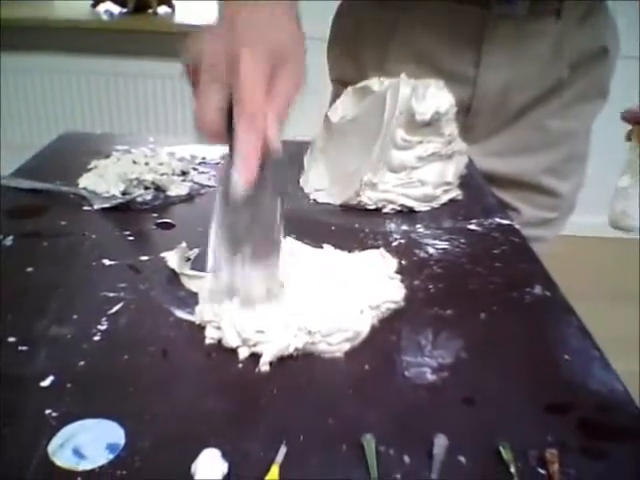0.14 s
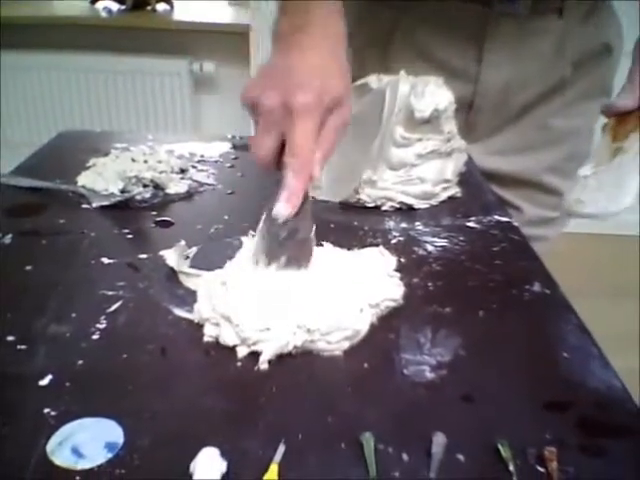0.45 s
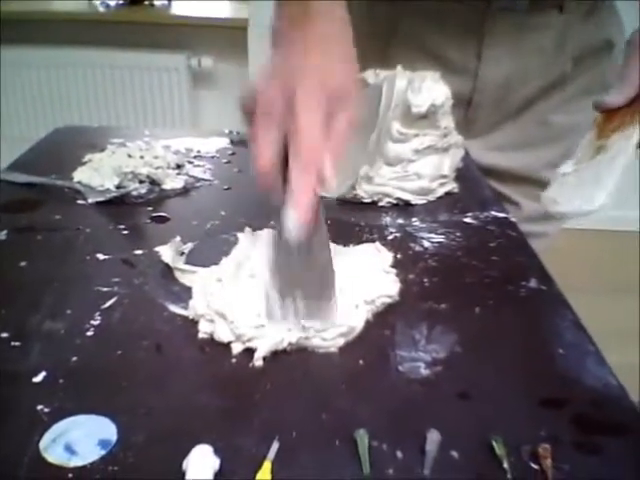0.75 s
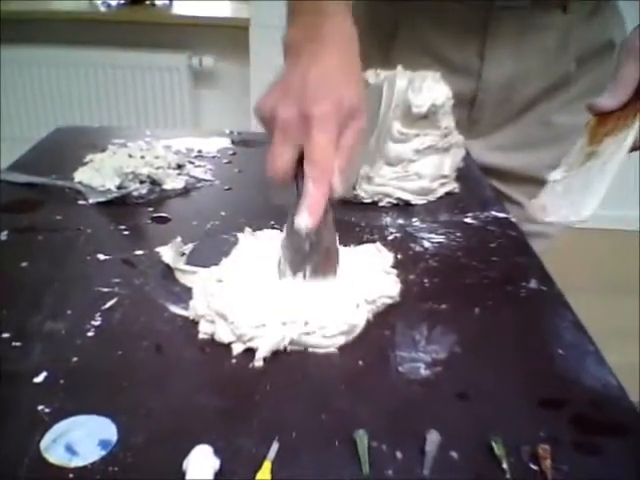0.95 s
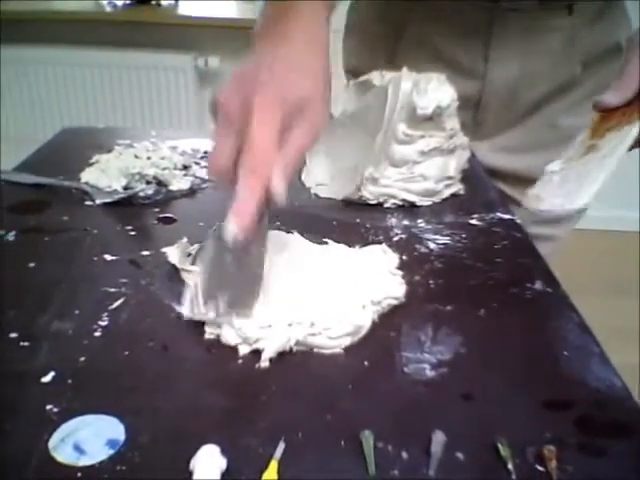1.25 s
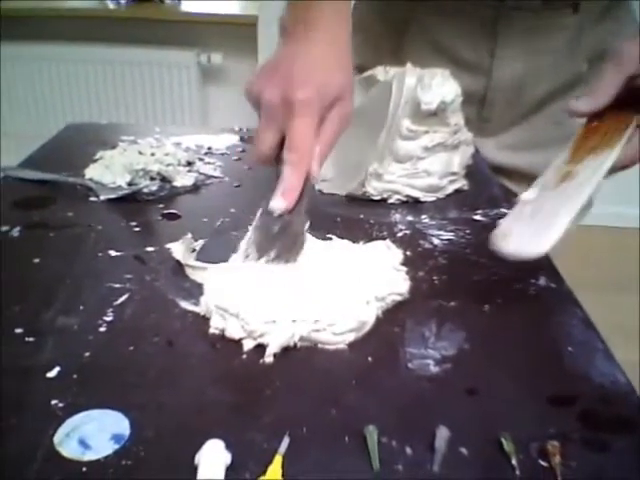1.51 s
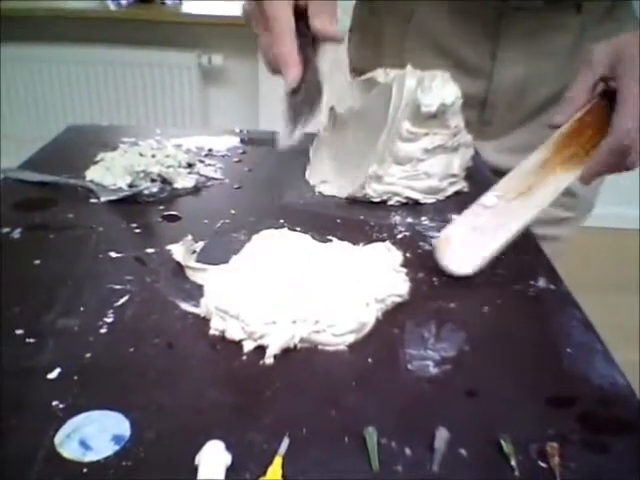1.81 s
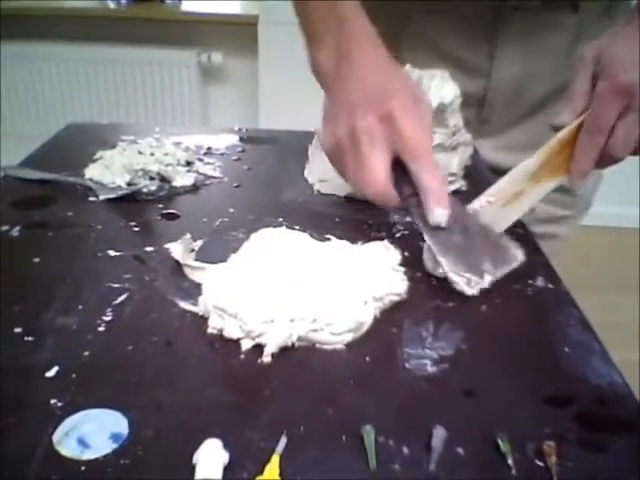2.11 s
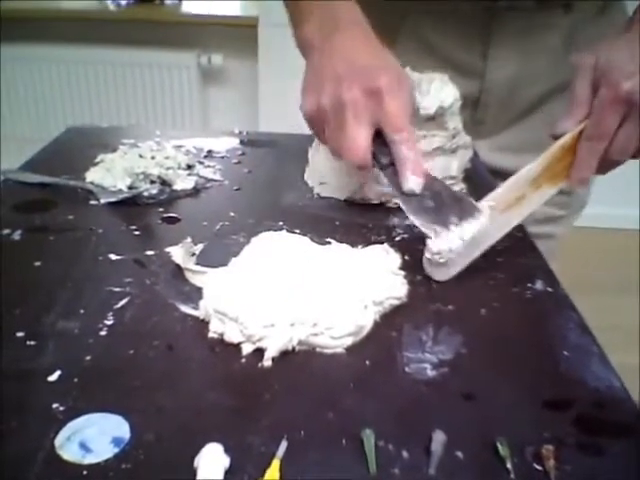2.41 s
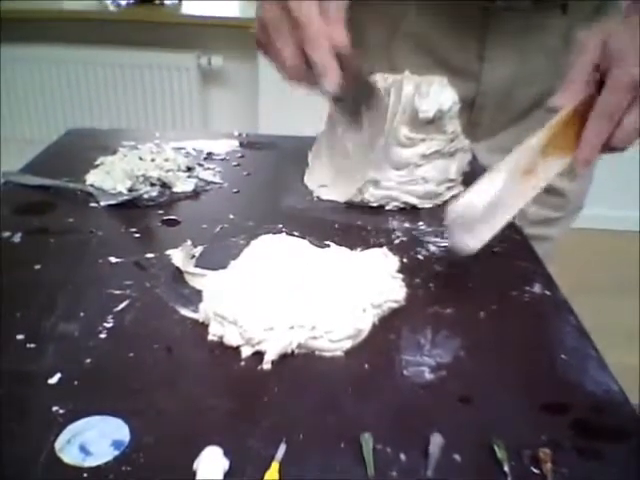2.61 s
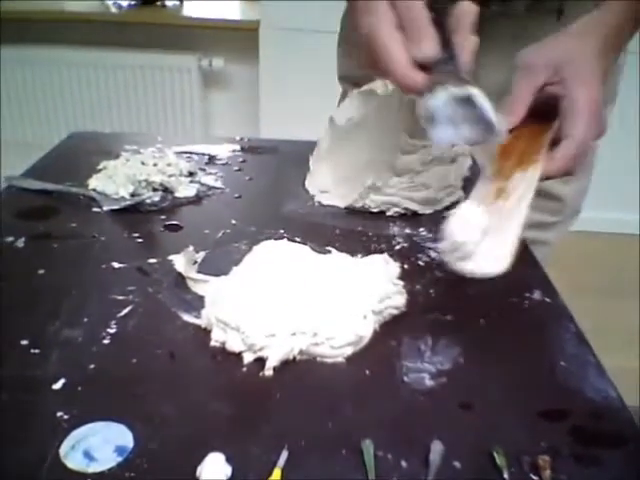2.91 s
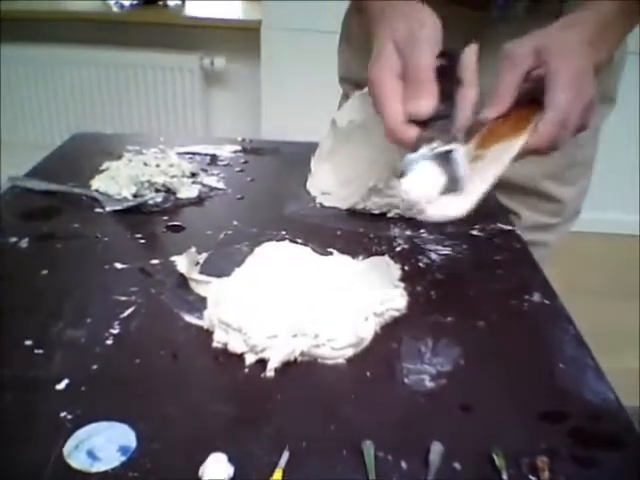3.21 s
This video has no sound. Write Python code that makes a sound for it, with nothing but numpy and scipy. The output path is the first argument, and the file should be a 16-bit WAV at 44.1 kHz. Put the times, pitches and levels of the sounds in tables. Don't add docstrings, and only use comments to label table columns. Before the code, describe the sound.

A steel knife taps and smears wet clay on a tabletop with soft hisses and sticky snaps, then knocks dully on a wooden bat and chatters off it loudly; close recorder, quiet hard room, low hum.

```python
import sys
import numpy as np
from scipy import signal
from scipy.fft import rfft, irfft
from scipy.io import wavfile
from scipy.ndimage import uniform_filter1d

SR = 44100
rng = np.random.default_rng(int(sys.argv[2]) if len(sys.argv) > 2 else 0)


def transcribe(u):
    v = np.clip(np.atleast_2d(u).T, -1, 1)
    q = np.round(v * 32767).astype(np.int16)
    wavfile.write(sys.argv[1], SR, q)


def decibels_to_gain(level_db):
    exponent = np.asarray(level_db, float) / 20
    return 10 ** exponent


N = 147735


def walk(rate_hz):
    k = int(SR / rate_hz)
    held = np.repeat(rng.standard_normal(N // k + 1), k)
    return 1.48 * uniform_filter1d(uniform_filter1d(held, k), k)[:N]


def unit(x):
    return x / np.sqrt(np.mean(x ** 2))


def peak(x):
    return x / np.abs(x).max()


def decay(t_s, t60_s):
    return np.exp(-np.log(1000) * t_s / t60_s)


def tint(x, table, lo_hz=0., hi_hz=31200.0):
    f = np.fft.rfftfreq(len(x), 1 / SR) + 1e-3
    hz, db = np.array(table).T
    edge = 1 / np.sqrt((1 + (lo_hz / f) ** 8) * (1 + (f / hi_hz) ** 8))
    gain = decibels_to_gain(np.interp(np.log(f), np.log(hz), db))
    return irfft(rfft(x) * gain * edge, len(x))


def band(x, hz, width_hz):
    return signal.lfilter(*signal.iirpeak(min(hz, .45 * SR), hz / width_hz, SR), x)


def band_twice(x, hz, width_hz):
    return band(band(x, hz, width_hz), hz, width_hz)


def ring(modes, chance, scatter_db, detune, rise_s, length_s=0.35):
    hz, db, t60_s = np.array(modes).T[:, :, None]
    t, k = np.arange(int(length_s * SR)) / SR, len(modes)
    level_chance, pitch_chance, phase_chance = chance[:3 * k].reshape(3, k, 1)
    hz = hz * (1 + detune * pitch_chance)
    swell = (1 - np.exp(-t / rise_s)) * decay(t, t60_s)
    return decibels_to_gain(db + scatter_db * level_chance) * np.sin(2 * np.pi * hz * t + 2 * phase_chance) * swell


def crack(t60_s, size=2048):
    return rng.standard_normal(size) * decay(np.arange(size) / SR, t60_s)


def add(out, start_s, x, peak_db):
    i = int(start_s * SR)
    n = min(len(x), N - i)
    out[i:i + n] += peak(x)[:n] * decibels_to_gain(peak_db)


def grit(strokes):
    t, press, hiss = np.arange(N) / SR, np.zeros(N), np.zeros(N)
    for start_s, rise_s, fall_s, db, hiss_db in strokes:
        u = t - start_s - rise_s
        rising = np.clip(1 + u / rise_s, 0, 1) ** 2
        falling = np.exp(-2.3 * np.maximum(u, 0) / fall_s)
        stroke = decibels_to_gain(db) * np.where(u < 0, rising, falling)
        press = np.hypot(press, stroke)
        hiss = np.hypot(hiss, stroke * decibels_to_gain(hiss_db))
    grains_per_s, spread_db = 3000, 2.2
    hits = rng.random(N) < grains_per_s / SR
    sizes = decibels_to_gain(spread_db * np.minimum(rng.exponential(size=N), 2.5))
    grains = hits * sizes * rng.choice([-1, 1], N)
    rough = (unit(grains) + 0.21 * rng.standard_normal(N)) * decibels_to_gain(1.2 * walk(90.))
    return press, hiss, rough


def rub(strokes, body, paste):
    press, hiss, rough = grit(strokes)
    tool = np.zeros(N)
    for hz, width_hz, db in body:
        tool += decibels_to_gain(db + 2.5 * walk(45.)) * band_twice(rough, hz, 1.6 * width_hz)
    return press * unit(tool) + hiss * unit(tint(rough, paste, lo_hz=420.0))


def tone(hz, db):
    return decibels_to_gain(db + 2) * np.sin(2 * np.pi * np.cumsum(hz) / SR)


# time in seconds, peak in dB, pitch in Hz.
JOLTS = [
    (0.382, -54.5, 59.4),
    (1.407, -56.5, 46.3),
    (1.559, -49.5, 44.5),
    (1.601, -46.5, 78),
]


def jolts():
    out = np.zeros(N)
    for s, db, hz in JOLTS:
        cycles = np.arange(int(1.5 * SR / hz)) * hz / SR
        add(out, s, -np.sin(2 * np.pi * cycles) * np.sin(np.pi * cycles / 1.5), db)
    return out


# frequency in Hz, level in dB.
AIR_MID = [(8.8, -35), (15, 8), (144, -9), (392, -19), (465, -19.5), (1380, -25.5), (1940, -25.5),
           (3070, -31.5), (14000, -35.5)]
AIR_SIDE = [(8.8, 0), (15, 13), (53, 1), (171, -17), (1070, -27.5), (1160, -28), (2510, -32.5),
            (11500, -34.5), (14000, -33.5)]


def air():
    rumble_hz, rumble_lean = 89, -0.39
    mid = unit(tint(rng.standard_normal(N), AIR_MID))
    side_noise = rng.standard_normal(N)
    side = unit(tint(side_noise, AIR_SIDE))
    side = side + rumble_lean * tint(side, [(1, 0.0055), (2, 0.024)], hi_hz=rumble_hz)
    heave = decibels_to_gain(2.5 * walk(6.)) - 1
    mid, side = (v + heave * tint(v, [(1, 0.029), (2, 0.014)], hi_hz=rumble_hz) for v in (mid, side))
    hum = tone(134.6 * (1 + 0.0114 * walk(15.0)), -71.5 + 0.9 * walk(29.75))
    whine = tone(np.full(N, 13485), -86.5 + 0.86 * walk(23.0))
    jolt = jolts()
    mid = decibels_to_gain(-61.5) * mid + hum + whine + jolt
    side = decibels_to_gain(-58) * side - 2.2 * jolt
    return np.array([mid + side, mid - side])


# centre in Hz, t60 in seconds, level in dB.
ROOM = [(154, 0.59, -36), (413, 0.46, -33), (1000, 0.28, -54), (2500, 0.88, -46), (6200, 0.38, -46),
        (11200, 0.085, -31)]


def room_tail():
    gap_s = 0.0025
    t = np.arange(int(.7 * SR)) / SR
    tail = np.zeros(len(t))
    for hz, t60_s, db in ROOM:
        echoes = unit(band(rng.standard_normal(len(t)), hz, 0.57 * hz))
        tail += decibels_to_gain(db) * echoes * np.sqrt(hz / SR) * decay(t, t60_s)
    return tail * np.minimum(t / gap_s, 1) ** 2


def room(x):
    mid, side = room_tail(), 0.71 * room_tail()
    return np.array([signal.fftconvolve(x, mid + side)[:N], signal.fftconvolve(x, mid - side)[:N]])


def arm_thump():
    out, hz = np.zeros(N), 130
    add(out, 2.4, band(crack(.12, size=8192), hz, 1.4 * hz), -44)
    return out


# frequency in Hz, level in dB, t60 in seconds.
BAT = [(192, -0.5, 0.073), (304, -6.5, 0.093), (423, 1, 0.03), (509, -5.5, 0.052), (591, -6, 0.049),
       (850, -2.5, 0.027), (1094, -1.5, 0.029), (1290, -9.5, 0.021), (2043, -3, 0.018), (2730, -16, 0.024),
       (3310, -11.5, 0.025)]
# time in seconds, peak in dB, hardness in dB, two deepest modes in dB.
KNOCKS = [
    (1.689, -55.5, -19, -4.5),
    (2.042, -32.5, 1.5, -5),
    (2.157, -37, -3.5, 4),
    (2.293, -46, -5.5, 3),
]


def bat_knocks():
    out, thud_hz = np.zeros(N), 410
    for s, db, hard_db, deep_db in KNOCKS:
        chance = rng.standard_normal(36)
        low = ring(BAT[:5], chance, 1., .02, .006)
        high = ring(BAT[5:], chance[15:], 1.5, .02, .001)
        x = peak(decibels_to_gain(deep_db) * low[:2].sum(axis=0) + low[2:].sum(axis=0))
        x += decibels_to_gain(hard_db) * peak(high.sum(axis=0))
        thud = peak(band(crack(0.47, size=len(x)), thud_hz, 0.59 * thud_hz))
        x += decibels_to_gain(-8.5) * thud * np.minimum(np.arange(len(x)) / SR / 0.0063, 1)
        add(out, s, x, db)
    return out


# frequency in Hz, level in dB per Hz.
PASTE = [(300, -8), (1000, -2), (3000, 0), (6000, -8), (13500, -11)]
# start, rise, fall in seconds, level in dB, hiss in dB.
WIPES = [
    (2.335, 0.072, .12, -50.5, 0),
]
# frequency in Hz, width in Hz, level in dB.
BAT_RUB = [(716, 130, 1.5), (1400, 120, -6), (1840, 320, 4), (2600, 210, 1), (3280, 120, 3),
           (3550, 360, 0.5), (4260, 300, -1.5), (7760, 1500, -10), (11500, 1700, -10)]


def bat_wipes():
    return rub(WIPES, BAT_RUB, PASTE)


# start, rise, fall in seconds, level in dB, hiss in dB.
SKIDS = [
    (2.44, 0.098, 0.21, -60, 0),
    (2.59, 0.057, 0.038, -42.5, 1.5),
    (2.66, 0.0075, 0.16, -55.5, 10),
]
# frequency in Hz, width in Hz, level in dB.
SKID_RUB = [(800, 400, -22), (1900, 310, 2.5), (2660, 370, 1), (3560, 780, 3.5), (4250, 300, -1),
            (7900, 3100, -10)]


def edge_skids():
    return rub(SKIDS, SKID_RUB, PASTE)


# frequency in Hz, level in dB, t60 in seconds.
EDGE = [(1000, -7, .012), (1280, -4, .013), (1550, -1, .014), (2460, -4, .012), (2800, -6, .011),
        (3750, -7, .01), (4280, 2, .012), (6690, -1, .008), (7780, -6, .007), (8600, -6, .007),
        (11000, -7, .005)]
TIP = [(3510, 0.5, 0.0081), (4130, -7, 0.011), (4940, -2, 0.0089), (9200, 0.5, 0.0037), (11700, 2, 0.0064)]
BELLY = [(758, -6, 0.02), (908, -2.5, 0.014)]
# time in seconds, peak in dB, crackle in seconds, tip in dB, belly in dB.
FLICKS = [(2.6368, -18, .012, 4.5, -8), (2.6377, -19, 0.026, 12, -4), (2.6402, -21.5, 0.039, -14, 0),
          (2.6431, -21.5, 0.016, -2, -7), (2.6459, -19.5, 0.013, -2, -5.5), (2.649, -14.5, 0.0073, -1, -21),
          (2.65, -10.5, 0.0077, -9, -17), (2.6523, -18.5, 0.019, -14, -25), (2.656, -23, 0.011, -6, -6),
          (2.6659, -30, 0.0098, -20, -1), (2.6669, -17.5, 0.024, -12, -14), (2.6705, -25, 0.028, -6, -14)]


def edge_flicks():
    out = np.zeros(N)
    for s, db, crackle_s, tip_db, belly_db in FLICKS:
        edge, tip, belly = (
            peak(ring(modes, rng.standard_normal(33), 2.5, .03, .0003, length_s=.08).sum(axis=0))
            for modes in (EDGE, TIP, BELLY))
        x = edge + decibels_to_gain(tip_db) * tip + decibels_to_gain(belly_db) * belly
        x[:2048] += decibels_to_gain(-0.5) * peak(tint(crack(crackle_s), PASTE))
        wood = ring(BAT[:5], rng.standard_normal(30), 0.67, 0.0024, 0.0077, length_s=.08).sum(axis=0)
        add(out, s, x + decibels_to_gain(-26) * peak(wood), db)
    return out


# frequency in Hz, level in dB, t60 in seconds.
PAT = [(587, -20, 0.024), (1027, 2, 0.023), (1947, 3.5, 0.022), (2220, 1, 0.021), (2690, -4, 0.02),
       (3310, -6, 0.022), (4000, -2.5, 0.022), (4850, -11.5, 0.026), (7060, -16, 0.013)]


def blade_pat():
    out = np.zeros(N)
    x = peak(ring(PAT, rng.standard_normal(30), 0, 0, 0.00034).sum(axis=0))
    x[:2048] += decibels_to_gain(-16) * peak(band(crack(0.04), 8900.0, 10000.0))
    add(out, 3.1905, x, -31.5)
    return out


# time in seconds, peak in dB, centre in Hz.
SNAPS = [(.032, -55.5, 2000), (.5305, -49, 1020), (0.559, -51, 1400), (.595, -57, 7000), (.6005, -50, 1090),
         (.603, -48.5, 1440), (.655, -47.5, 2500), (0.706, -42, 7040), (1.018, -48, 7900),
         (1.112, -52, 4000), (1.14, -48.5, 6850), (1.18, -52, 7040), (1.232, -49.5, 6940),
         (1.243, -56, 3500), (.05, -54.5, 6000), (1.164, -62, 6000), (1.196, -63, 5000), (1.263, -60, 6000),
         (1.584, -61, 10100), (1.847, -48, 11500), (1.7295, -41, 4300)]


def clay_snaps():
    out = np.zeros(N)
    for s, db, hz in SNAPS:
        add(out, s, band_twice(crack(.006), hz, 1.6 * hz), db)
    return out


# start, rise, fall in seconds, level in dB, hiss in dB.
SMEARS = [(.0, 0.027, 0.044, -80, -2), (.1, 0.068, 0.019, -71, 6), (.37, 0.042, 0.035, -64.5, 6.5),
          (.5, 0.086, 0.26, -83, -21), (.7, 0.021, 0.025, -65, -7), (.951, 0.0098, 0.0082, -57.5, 9.5),
          (.96, .014, 0.62, -73.5, 6.5), (1.1, 0.16, 0.02, -69.5, 7), (1.43, 0.018, 0.087, -65.5, -3),
          (1.78, 0.024, 0.12, -67, -4), (1.89, 0.067, 0.23, -63, 5.5), (2.06, 0.028, 0.05, -82, 17),
          (2.14, 0.054, 0.24, -76, 11.5), (3.01, 0.047, 0.065, -70, 6.5), (3.185, 0.0084, 0.068, -69, 14),
          (3.2, 0.048, 0.15, -69, 13)]
# frequency in Hz, width in Hz, level in dB.
BLADE_RUB = [(950, 130, 2), (1630, 450, -7.5), (2210, 340, 2.5), (3334, 310, 8), (4360, 680, -4)]
# frequency in Hz, level in dB per Hz.
CLAY = [(300, -6), (1000, -7.5), (3000, -3.5), (6000, -10.5), (13500, -10.5)]


def clay_smears():
    return rub(SMEARS, BLADE_RUB, CLAY)


# frequency in Hz, level in dB, t60 in seconds.
BLADE = [(1007, -3.5, 0.021), (1350, -10, 0.011), (2292, -8, 0.021), (3355, 8, 0.0095), (3638, 3.5, 0.0099),
         (4480, -15, 0.013), (5010, -24, 0.013), (7380, -5, 0.0086), (8450, -1, 0.0074),
         (9900, -28, 0.0057)]
# time in seconds, peak in dB, lowest mode in Hz, lowest mode in dB, crack in dB.
TAPS = [(.162, -49.5, 820, -9, -2), (.218, -50, 880, -12, -10), (.398, -45.5, 1000, -3, -6),
        (0.4068, -36.5, 1014, -6, 0), (.7062, -48.5, 850, -5, -7), (.719, -51, 790, 1, -6),
        (0.9596, -26.5, 1007, -12.5, -4.5), (0.977, -54, 1000, -11, 1), (.992, -51, 1000, -8, -14),
        (1.03, -55, 1000, -6, -14), (1.272, -57, 930, 14, -14), (1.249, -52.5, 840, 1, -10),
        (1.262, -52, 940, 5, -5), (1.44, -47, 950, 11.5, 8), (1.451, -40, 1000, -8, 1.5),
        (1.682, -57.5, 900, -22, -16), (1.795, -55, 880, -21, -14), (1.812, -57, 850, 4, -14),
        (1.822, -61, 850, 8, -14), (1.845, -54, 850, -4, -12), (1.837, -46, 827, 1, 1)]


def knife_taps():
    out = np.zeros(N)
    for s, db, low_hz, low_db, crack_db in TAPS:
        blade = [(low_hz, *BLADE[0][1:])] + BLADE[1:]
        modes = ring(blade, rng.standard_normal(30), 2.5, .025, .001, length_s=.06)
        x = peak(modes[1:].sum(axis=0)) + decibels_to_gain(low_db) * peak(modes[0])
        x[:2048] += decibels_to_gain(crack_db) * peak(band(crack(0.015), 5000.0, 13000.0))
        add(out, s, x, db)
    return out


def ports(x, left_lag_s, left_db):
    half = np.exp(-1j * np.pi * np.fft.rfftfreq(N, 1 / SR) * left_lag_s)
    return np.array([decibels_to_gain(left_db) * irfft(rfft(x) * half, N), decibels_to_gain(-left_db) * irfft(rfft(x) / half, N)])


def scene():
    low_cut = signal.butter(3, 139, "high", fs=SR, output="sos")
    bat_work = bat_knocks() + bat_wipes() + edge_skids() + edge_flicks()
    held = signal.sosfilt(low_cut, bat_work) + arm_thump()
    table = signal.sosfilt(low_cut, blade_pat() + clay_snaps() + clay_smears() + knife_taps())
    direct = ports(table, -0.000027, 0.5) + ports(held, -0.000028, 0.44)
    return direct + room(table + held) + air()


def low_pass(x):
    return signal.sosfilt(signal.butter(12, 14640, fs=SR, output="sos"), x)


def record(dry):
    top_hz = 13700
    roll_off = signal.cheby2(8, 40, top_hz * 1.112, fs=SR, output="sos")
    return low_pass(signal.sosfilt(roll_off, dry))


dry = scene()
out = record(dry)
transcribe(out)
```